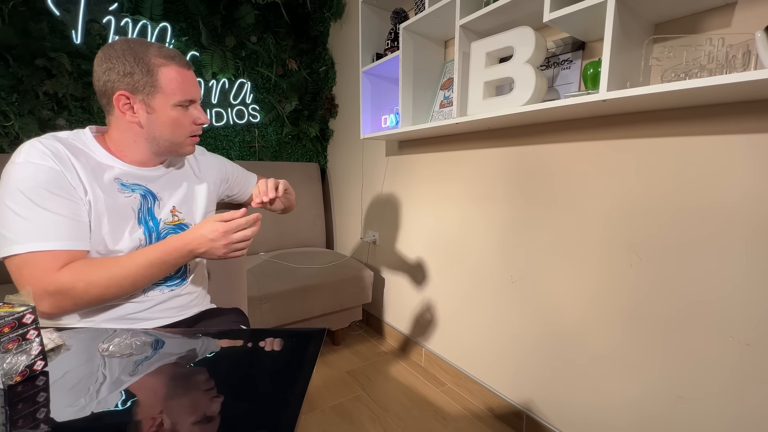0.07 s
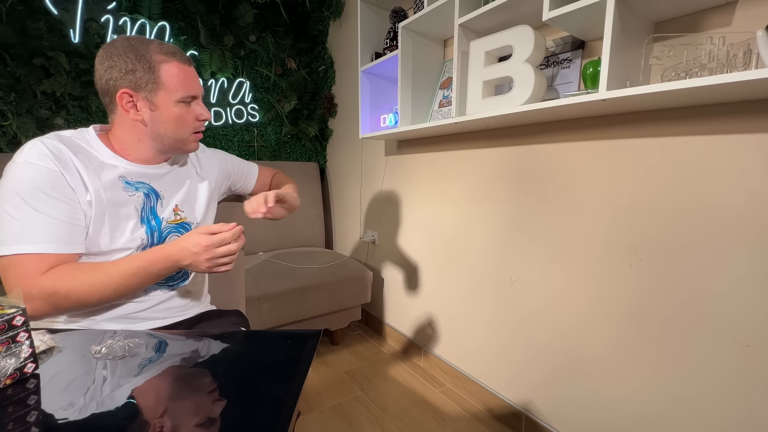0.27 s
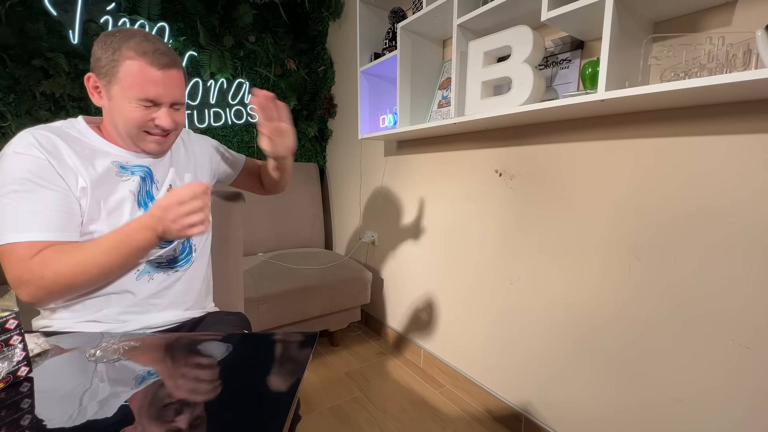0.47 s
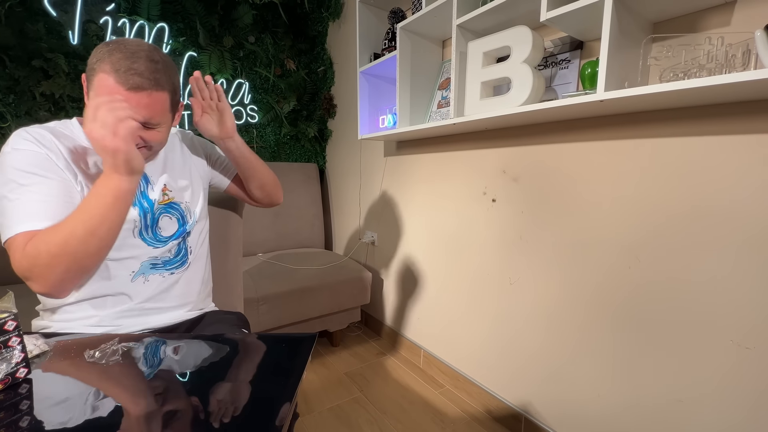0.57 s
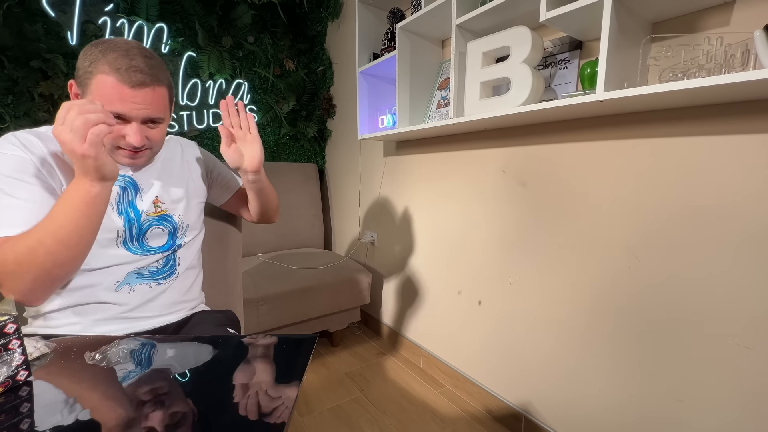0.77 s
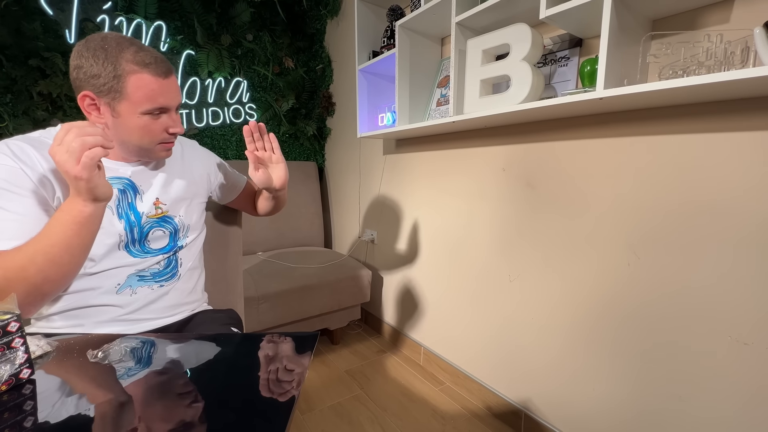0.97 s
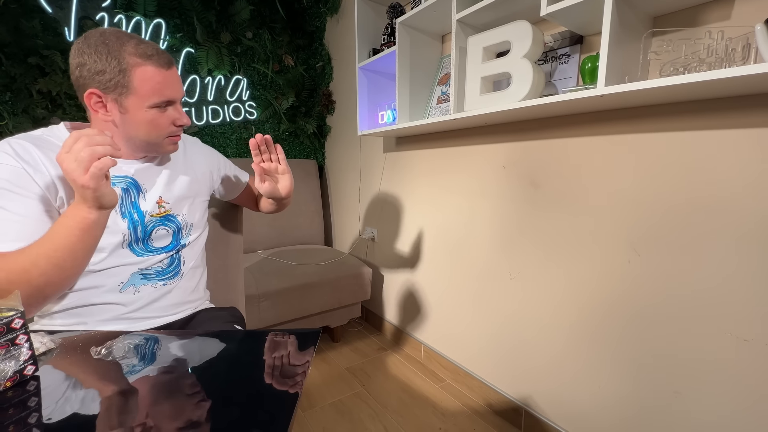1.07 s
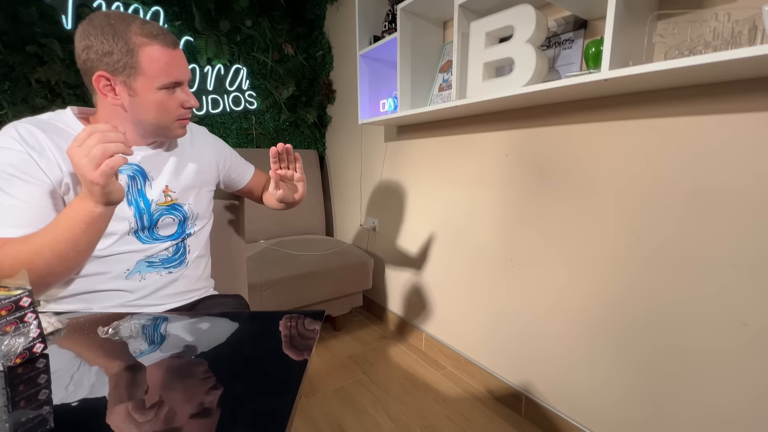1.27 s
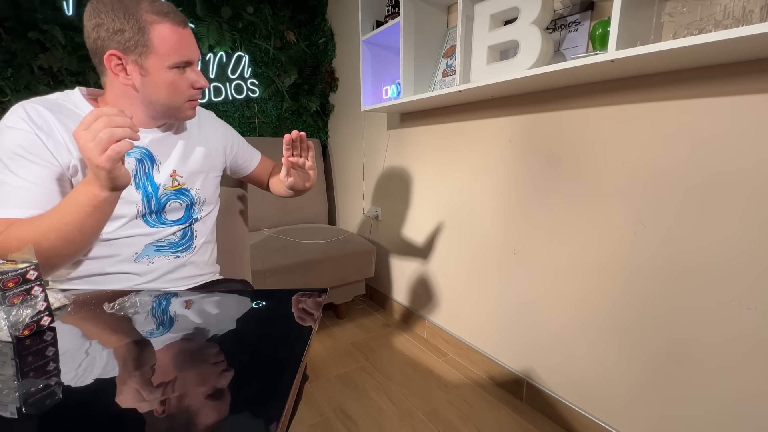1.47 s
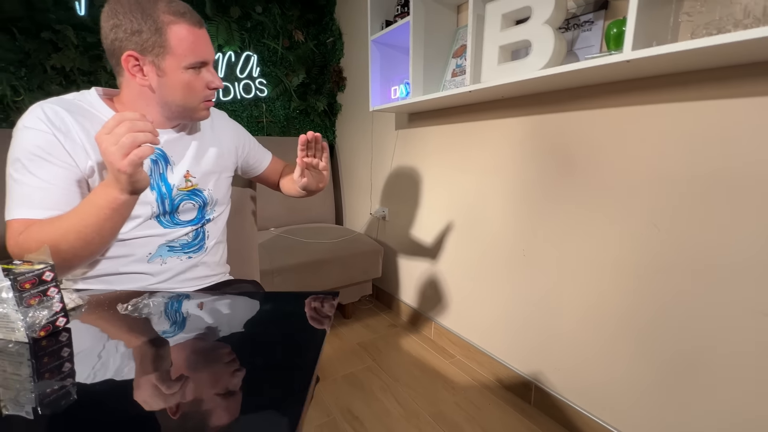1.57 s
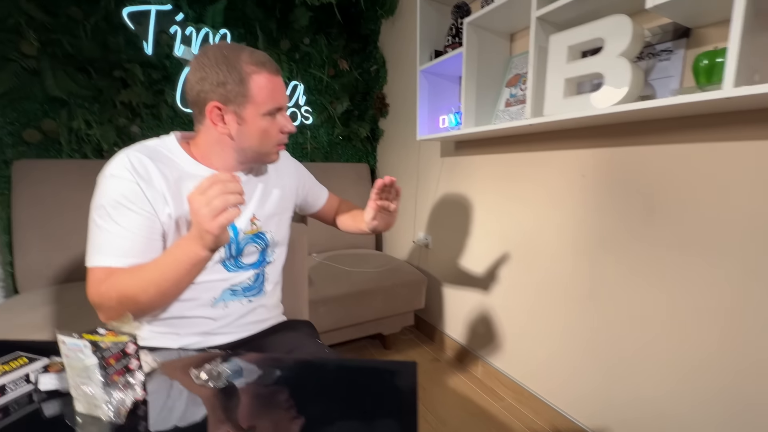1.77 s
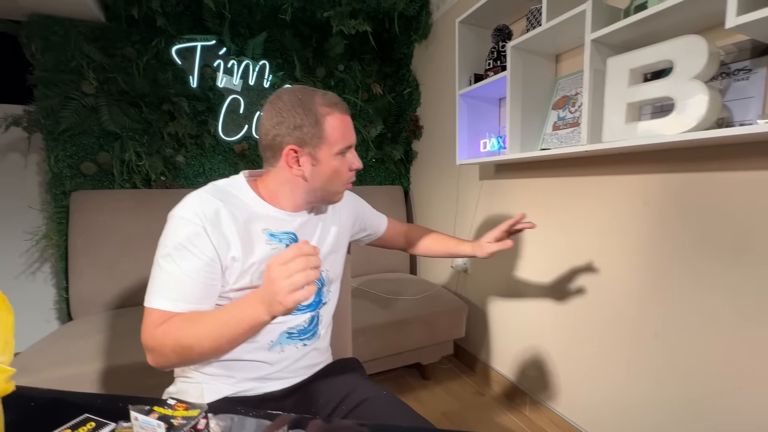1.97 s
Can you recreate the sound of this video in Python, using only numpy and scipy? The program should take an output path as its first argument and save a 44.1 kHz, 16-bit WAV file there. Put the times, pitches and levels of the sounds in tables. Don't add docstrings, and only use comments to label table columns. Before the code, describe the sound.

A snap pop bursts on a wall with one sharp, loud crack in a small room.

```python
import sys
import numpy as np
from scipy import signal
from scipy.fft import rfft, irfft, next_fast_len
from scipy.io import wavfile
from scipy.ndimage import uniform_filter1d

SR = 44100
rng = np.random.default_rng(int(sys.argv[2]) if len(sys.argv) > 2 else 0)


def transcribe(signal):
    frames = np.atleast_2d(signal).T
    limited = np.clip(frames, -1, 1)
    pcm = np.round(limited * 32767).astype(np.int16)
    wavfile.write(sys.argv[1], SR, pcm)


def volts_from_decibels(level):
    exponent = np.asarray(level, float) / 20
    return 10 ** exponent


N = 88552
CRACK_S = .36


def read(table, hz):
    table = np.array(table)
    return np.interp(np.log(np.maximum(hz, 1)), np.log(table[:, 0]), table[:, 1])


def noise(db_of):
    n = next_fast_len(N, True)
    hz = np.arange(n // 2 + 1) * SR / n
    white = rng.standard_normal((2, n))
    x = irfft(rfft(white) * volts_from_decibels(db_of(hz)), n)[:, :N]
    return x / np.sqrt(np.mean(x ** 2))


def hump(hz, width_oct):
    return lambda f: -np.minimum(12 * (np.log2(np.maximum(f, 1) / hz) / width_oct) ** 2, 80)


def fade(u, t60, rise):
    v = np.maximum(u, 0)
    return (1 - np.exp(-v / rise)) * volts_from_decibels(-60 * v / t60)


def walk(rate):
    k = int(SR / rate)
    steps = np.repeat(rng.standard_normal((2, N // k + 1)), k, axis=1)
    return 0.99 * uniform_filter1d(steps, k)[:, :N]


def lean(db):
    return volts_from_decibels(np.array([[db / 2], [-db / 2]]))


# hz, level_db per Hz
FAN_COLOUR = [(18, -64), (45, -19.5), (190, -15.5), (520, -18), (1110, -12.5), (1520, -5), (2500, -21),
              (3250, -50.5), (5500, -120)]
FAN_DB, FAN_SWELL_DB, FAN_LEAN_DB = -60.5, 1, 10
PEAK_HZ, PEAK_WIDTH_HZ, PEAK_DB, FLICKER_DB = 1743, 220, 6.5, 4.5


def fan(t):
    bed = noise(lambda f: read(FAN_COLOUR, f) - 1.0 * (f < 1300)) * volts_from_decibels(0.99 * walk(7.6))
    flicker_db = FLICKER_DB * np.tanh(walk(70))
    peak = noise(hump(PEAK_HZ, PEAK_WIDTH_HZ / 1000)) * volts_from_decibels(PEAK_DB - 8 + flicker_db)
    return volts_from_decibels(FAN_DB - 5 + FAN_SWELL_DB * t / 2) * (bed + peak) * lean(FAN_LEAN_DB)


# hz, level_db per Hz
HISS_COLOUR = [(1470, -36), (2500, -10), (2800, -14), (3320, -5.5), (3810, -25), (5640, -3), (7580, -7.5),
               (9230, -23.5), (12000, -18.5), (15600, -41), (22000, -120)]
HISS_DB = -73.5
QUIET_TOP_HZ, QUIET_TOP_DB = 12800, -19


def air_hiss():
    colour = noise(lambda f: read(HISS_COLOUR, f) + QUIET_TOP_DB * (f > QUIET_TOP_HZ))
    return volts_from_decibels(HISS_DB + 1.5 * walk(4.9)) * lean(3.9) * colour


# time_s, level_db
RUSTLE_LEVEL = [
    (0, -87.5),
    (.6, -62.5),
    (.68, -81.5),
    (.76, -95),
    (1.5, -86),
    (1.7, -74.5),
    (1.87, -65.5),
    (2.0, -72.5),
]


def cloth(t):
    level_db = np.interp(t, *np.array(RUSTLE_LEVEL).T) + 2.3 * walk(80)
    return noise(hump(4500, 1.2)) * volts_from_decibels(level_db)


# start_s, length_s, level_db, pitch_hz
BRIGHT_RUSTLES = [(0.767, 0.08, -70, 15200), (.885, .04, -68, 15200), (.93, 0.053, -68, 15200),
                  (1.122, .035, -76, 15000), (1.198, 0.056, -72, 15200), (1.331, 0.062, -65.5, 15000),
                  (1.4, .09, -74.5, 15600), (1.332, 0.067, -68, 13000), (1.497, .015, -74, 15400),
                  (1.543, .05, -74, 15100), (1.635, 0.041, -75, 15600), (1.705, 0.018, -78.5, 15000),
                  (1.845, .065, -73, 15100)]


def bright_rustles(t):
    out = 0
    for start, length, db, hz in BRIGHT_RUSTLES:
        hold = np.clip(np.minimum(t - start, start + length - t) / 0.0065, 0, 1)
        out = out + volts_from_decibels(db + 3 * walk(150)) * hold * noise(hump(hz, .07))
    return out


# start_s, peak_db, pitch_hz, t60_s, left_minus_right_db
KNOCK_EVENTS = [(0.422, -53.5, 200, 0.2, 9), (.57, -58, 303, 0.43, -6), (.655, -48.5, 260, 0.39, -1.5),
                (.69, -56.5, 300, 0.38, 3), (0.999, -54, 206, 0.1, 1.5), (1.08, -59.5, 80.6, 1, 7.5),
                (1.145, -50, 897, 0.15, -3), (1.161, -58, 67, 0.75, 8.5), (1.197, -57, 205, 0.18, 8.5),
                (1.259, -54, 202, 0.086, 11), (1.599, -53.5, 100, 0.11, 5), (1.646, -51, 300, 0.08, 3),
                (1.641, -51.5, 79, 0.17, 6.5), (1.804, -50.5, 350, 0.32, 1), (1.831, -62.5, 80, 0.25, 7),
                (1.957, -57.5, 300, 0.3, 2.5), (1.956, -49.5, 840, 0.35, -0.5),
                (1.58, -60, 1000, 0.59, 2.5)]


def knocks(t):
    out = 0
    for start, db, hz, t60, pan_db in KNOCK_EVENTS:
        body = noise(hump(hz, 1.69))
        out = out + volts_from_decibels(db - 5.0) * lean(pan_db) * fade(t - start, t60, 0.0044) * body
    return out


# start_s, peak_db, start_pitch_hz, t60_s, left_minus_right_db
TAP_EVENTS = [
    (0.505, -49, 450, 0.016, 0),
    (0.518, -41.5, 328, 0.11, 14),
    (1.143, -42.5, 1840, 0.0095, 5.5),
    (1.6421, -48.5, 627, 0.029, 15),
    (1.817, -56.5, 707, 0.046, 2),
    (1.955, -49, 1900, 0.0064, 5),
]
TAP_CYCLES = 2.24


def taps(t):
    out = 0
    for start, db, hz, t60, pan_db in TAP_EVENTS:
        age = np.maximum(t - start, 0)
        turns = TAP_CYCLES * np.log(1 + age * hz / TAP_CYCLES)
        tone = fade(t - start, t60, 0.43 / hz) * np.sin(2 * np.pi * turns)
        out = out - volts_from_decibels(db) * lean(pan_db) * tone
    return out


# start_s, peak_db, pitch_hz, t60_s
PIECE_RINGS = [
    (.8905, -47, 1290, 0.13),
    (.918, -49, 1320, .12),
    (.8845, -47, 2560, .06),
    (1.1435, -49, 1170, 0.045),
]


def piece_rings(t):
    out = 0
    for start, db, hz, t60 in PIECE_RINGS:
        tone = np.sin(2 * np.pi * hz * (t - start) + 0.97 * walk(90))
        out = out + volts_from_decibels(db) * fade(t - start, t60, 0.00074) * tone
    return out


# start_s, peak_db, pitch_hz, left_minus_right_db, room_tail_db
GRIT_TICKS = [(0.142, -68, 4430, 0, 5), (.22, -69, 7890, 2, 0), (.272, -61, 8200, 0, -9),
              (.8, -53, 7300, 4, -1.5), (0.851, -50, 9370, -11, -12), (0.887, -39.5, 8540, -3, -9),
              (0.892, -52.5, 8100, 13, 0), (0.929, -43.5, 6770, -3, -9), (.9285, -46, 11500, 0, -10),
              (.89, -43.5, 2370, -1.5, -5.5), (.963, -58, 14000, 2, -17), (1.126, -56, 6340, -0.5, 0),
              (1.142, -49, 2030, 5.5, -15), (1.226, -60.5, 8500, 1.5, -0.5), (1.333, -60, 12660, 4, -9),
              (1.245, -60, 9500, 3, -13.5), (1.543, -55, 4700, 3, -6), (1.5435, -53, 10500, 0, -11.5),
              (1.102, -65, 9500, -2, -5), (1.344, -57, 12600, 2, -13), (1.376, -62.5, 14950, 4, -8),
              (1.713, -74, 14800, 0, -16), (1.792, -64.5, 8400, 0.5, -6), (.77, -62, 12000, 0, -12),
              (1.633, -58, 8600, 4, -4.5), (1.859, -68.5, 9450, -5, 1.5)]
GRIT_T60_S, GRIT_ROOM_T60_S = 0.018, 0.34


def grit(t):
    out = 0
    for start, db, hz, pan_db, room_db in GRIT_TICKS:
        u = t - start
        wide = noise(hump(min(hz, 9000), 1.0))
        tick = fade(u, GRIT_T60_S, 0.00021) * (noise(hump(hz, 0.19)) + 1.03 * wide)
        tail = volts_from_decibels(room_db) * fade(u, GRIT_ROOM_T60_S, 0.0042) * wide
        out = out + volts_from_decibels(db - 4.0) * lean(pan_db) * (tick + tail)
    return out


# pitch_hz, left_db, right_db, t60_s
BASS_MODES = [
    (43.7, -41.7, -37.1, 1.8),
    (49.65, -36.3, -33.3, 1.5),
    (93, -54, -56, 1.6),
    (65.1, -15.3, -15.7, .14),
    (50.9, -17.3, -18, .18),
]
# upward_swing_s after the burst, right_lag_s
MODE_PHASE = [(.0284, -.0006), (.0316, -.0016), (.03, 0), (.048, -.004), (.0312, .0072)]
GONE_S, RELEASE_S = 0.72, .3
LOCK_S, LOCK_HZ = .4, 46.7


def bass_modes(u):
    out = 0
    release = np.clip((GONE_S - u) / RELEASE_S, 0, 1)
    for (hz, left_db, right_db, t60), (step, lag) in zip(BASS_MODES, MODE_PHASE):
        lock = (hz < 50) * (hz - LOCK_HZ) * np.maximum(u - LOCK_S, 0)
        turns = hz * (u - step - np.array([[0], [lag]])) - lock
        gains = volts_from_decibels(np.array([[left_db], [right_db]]))
        out = out + gains * fade(u, t60, 0.0089) * release * np.sin(2 * np.pi * turns)
    return out


# hz, level_db per Hz
TAIL_COLOUR = [(88, -48), (150, -11.5), (624, -7), (1170, -9), (2760, -10), (3220, -6), (6140, -1),
               (8730, 1), (16000, -38)]
# hz, left_minus_right_db
TAIL_BALANCE = [(60, 0.5), (110, -2.5), (200, -2.5), (380, -1.5), (700, -2.5), (1290, 3.5), (2380, -4),
                (4400, 11.5), (8120, -3), (15000, -12)]
# hz, t60_s
TAIL_DECAY = [(200, .25), (700, 0.41), (1500, 1.28), (3000, 1.083), (6000, 0.86), (10000, 0.5),
              (15000, 0.55)]
# time_s, gain_db
DUCK_GAIN = [
    (.36, -27),
    (.372, -11),
    (.384, 0),
    (.55, -0.5),
    (.66, 6.5),
    (.75, 1.5),
    (.86, -1),
]
TAIL_DB, AIR_DB, AIR_T60_S = -26, -50.5, .35
EARLY_DB, EARLY_SHARE = 11, 0.24


def diffuse_tail(u):
    out = 0
    for hz in 150 * 2 ** np.arange(0, 7, .5):
        t60 = read(TAIL_DECAY, hz)
        shape = fade(u, t60, .002) + volts_from_decibels(EARLY_DB) * fade(u, t60 * EARLY_SHARE, .002)
        band_db = read(TAIL_COLOUR, hz) + 10 * np.log10(hz / 5000) - 6.5
        out = out + volts_from_decibels(band_db) * lean(read(TAIL_BALANCE, hz)) * shape * noise(hump(hz, 0.53))
    top = noise(lambda f: -60. * (np.abs(f - 15100) > 900))
    air = volts_from_decibels(AIR_DB) * fade(u - .012, AIR_T60_S, 0.0045) * top
    duck = volts_from_decibels(np.interp(u + CRACK_S, *np.array(DUCK_GAIN).T))
    return (out * volts_from_decibels(TAIL_DB) + air) * duck


# hz, level_db per Hz
SMEAR_COLOUR = [(100, -9.5), (300, -2.5), (550, -5), (1000, -8), (2000, -13.5), (3700, -21), (6200, -14.5),
                (8200, -16.5)]
# pitch_hz, level_db
SMEAR_TONES = [(305, -2.5), (530, -6.5), (660, -10), (830, -7.5)]
SMEAR_S, SMEAR_DB, SMEAR_RISE_DB, SMEAR_END_T60_S = 0.029, -18.5, 14, .006
SURGE_DB, SURGE_S = 6.5, 0.003
SMEAR_TOP_HZ, SMEAR_OVER_DB = 8300, -27.5
COMB_DB, OPPOSED = 6, 0.37
TONES_END_S = .002


def smear(u):
    swell = np.clip(1 + u / SMEAR_S, 0, 1)
    rise_db = SMEAR_RISE_DB * (swell - 1) + SURGE_DB * np.exp(np.minimum(u, 0) / SURGE_S)
    end_db = -60 * np.maximum(u, 0) / SMEAR_END_T60_S
    shape = np.clip(swell / 0.39, 0, 1) * volts_from_decibels(rise_db + end_db)
    comb = COMB_DB * rng.standard_normal((2, 200))

    def colour(f):
        cut_db = SMEAR_OVER_DB * (f > SMEAR_TOP_HZ) - 40 * (f > 12500)
        return read(SMEAR_COLOUR, np.minimum(f, 8000)) + cut_db + comb[:, (f // 130).astype(int)]

    x = noise(colour)
    tones = 0
    for hz, db in SMEAR_TONES:
        tones = tones + volts_from_decibels(db) * np.sin(2 * np.pi * (hz * u + rng.random((2, 1))))
    tones = tones * np.clip(-u / TONES_END_S, 0, 1)
    return volts_from_decibels(SMEAR_DB) * shape * lean(-2) * (x - OPPOSED * x[::-1] / 2 + tones)


# level_db, polarity, start_s, cycles per e-fold of time, time_scale_s
PANEL_THUMP = [
    (-9.5, -1, .00033, 1.426, .00157),
    (-3.8, 1, .00014, 1.348, .00154),
]
THUMP_SAG, THUMP_T60_S = (.24, .2), .144
HOLE_HZ, HOLE_DB, HOLE_OCT = 170, (0, -9), .6


def thump(u):
    out = []
    for (db, sign, start, cycles, scale), sag, hole_db in zip(PANEL_THUMP, THUMP_SAG, HOLE_DB):
        age = 1 + np.maximum(u - start, 0) / scale
        pitch_hz = cycles / scale / age
        hole = volts_from_decibels(hole_db * np.exp(-(np.log2(pitch_hz / HOLE_HZ) / HOLE_OCT) ** 2))
        shape = fade(u - start + 0.00025, THUMP_T60_S, .0001) * age ** -sag
        out.append(sign * volts_from_decibels(db) * hole * shape * np.cos(2 * np.pi * cycles * np.log(age)))
    return np.array(out)


# lead_s, spike_db, microphone_ring_hz, ring_db, ring_rise_s
CRACK_SPIKE = [
    (0.0001, -3, 6100, -9, .0018),
    (-.0001, -3, 8800, -4, .0008),
]
ECHO_S, ECHO_DB = .0035, (-24.5, -12)


def crack(u):
    out = []
    for (lead, db, hz, ring_db, rise), echo_db in zip(CRACK_SPIKE, ECHO_DB):
        v = u - lead
        spike = -v / 3e-5 * np.exp(.5 - .5 * (v / 3e-5) ** 2)
        ring_shape = np.exp(np.where(v < 0, v / rise, -v / 0.00039))
        ring = ring_shape * np.sin(2 * np.pi * hz * v + 0.7 * walk(1500)[0])
        blast = volts_from_decibels(db) * spike + volts_from_decibels(ring_db) * ring
        out.append(blast - volts_from_decibels(echo_db) * np.roll(blast, int(ECHO_S * SR)))
    return np.array(out)


# hz, gain_db
DULL_TOP = [(9800, 0.5), (11000, -7), (12500, -7), (13400, -12), (14200, -13.5), (14700, -5.5), (15700, -9),
            (16000, -42.5)]
# hz, left_minus_right_db
PORT_BALANCE = [(1500, -1), (5000, 7.5), (7000, 6.5), (9000, -9.5), (12000, -2), (15000, -0.5)]


def scene():
    t = np.arange(N) / SR
    u = t - CRACK_S
    hz = np.arange(N // 2 + 1) * SR / N
    ports = volts_from_decibels(np.outer([.5, -.5], read(PORT_BALANCE, hz)))
    steady = fan(t) + air_hiss()
    small = cloth(t) + bright_rustles(t) + knocks(t) + taps(t) + piece_rings(t) + grit(t)
    room = bass_modes(u) + diffuse_tail(u)
    quiet = irfft((rfft(room + steady) + rfft(small) * ports) * volts_from_decibels(read(DULL_TOP, hz)), N)
    return quiet + smear(u) + thump(u) + crack(u)


def band_limit(x):
    return signal.sosfilt(signal.butter(12, 16990, fs=SR, output="sos"), x)


DIP_S, DIP_HALF_S = .8615, .008


def record(dry):
    t = np.arange(N) / SR
    dip = np.clip(np.abs(t - DIP_S) / DIP_HALF_S, .05, 1)
    rounded = np.tanh(0.71 * dry * dip) / 0.68
    top = signal.ellip(8, .2, 50, 16700, fs=SR, output="sos")
    low = signal.butter(2, 32, "high", fs=SR, output="sos")
    mix = signal.sosfilt(np.vstack([top, low]), rounded)
    return band_limit(mix)


dry = scene()
out = record(dry)
transcribe(out)
```